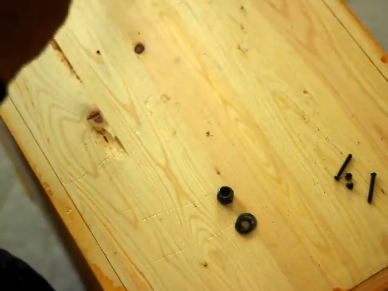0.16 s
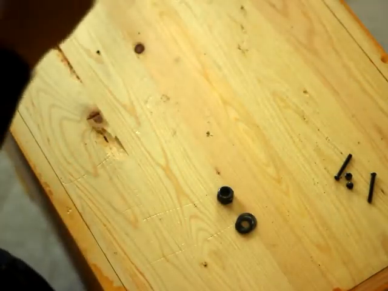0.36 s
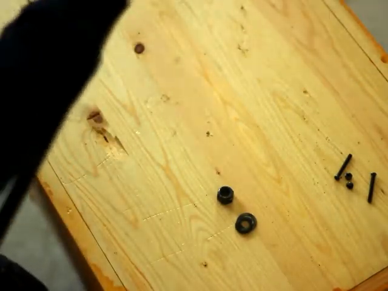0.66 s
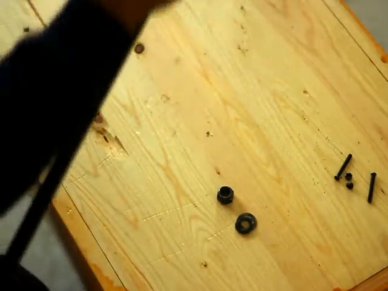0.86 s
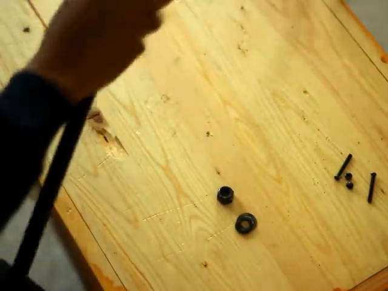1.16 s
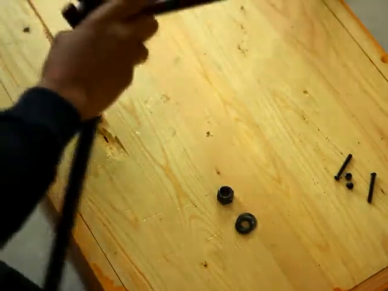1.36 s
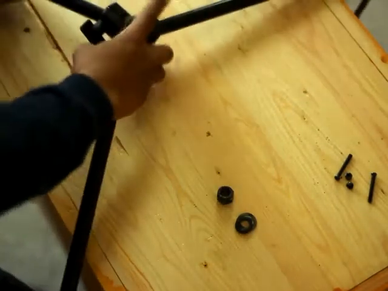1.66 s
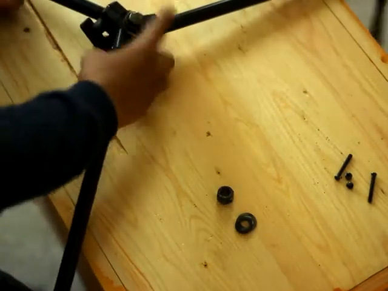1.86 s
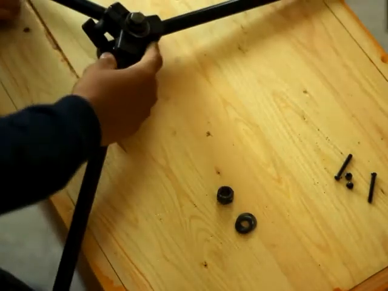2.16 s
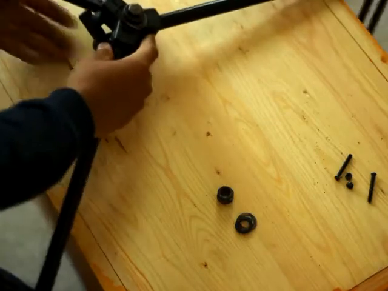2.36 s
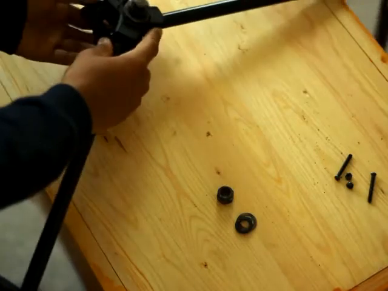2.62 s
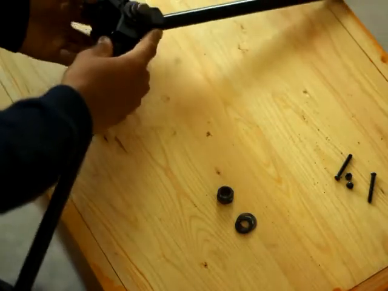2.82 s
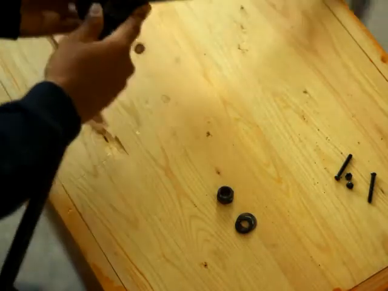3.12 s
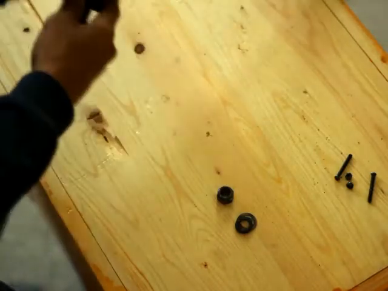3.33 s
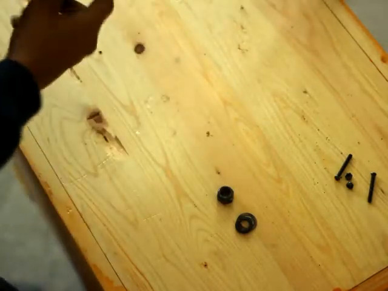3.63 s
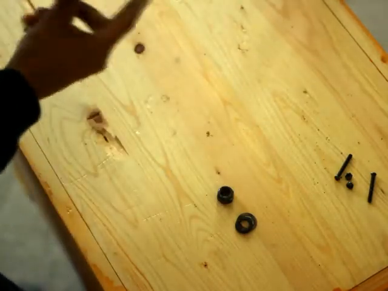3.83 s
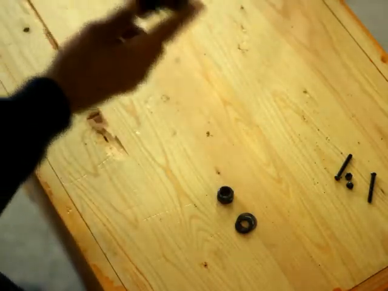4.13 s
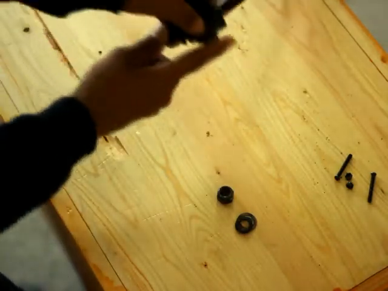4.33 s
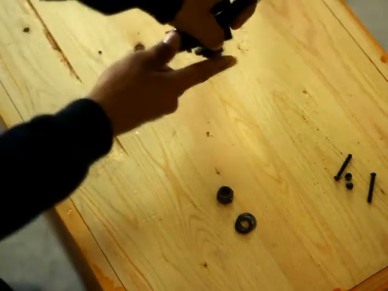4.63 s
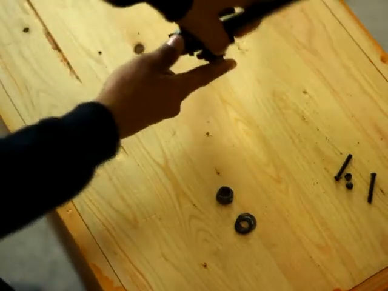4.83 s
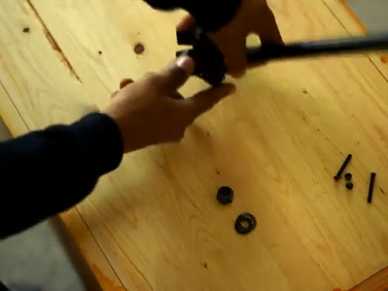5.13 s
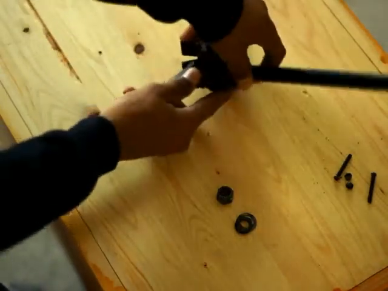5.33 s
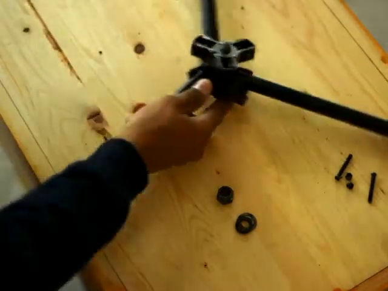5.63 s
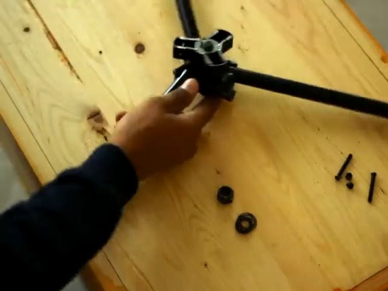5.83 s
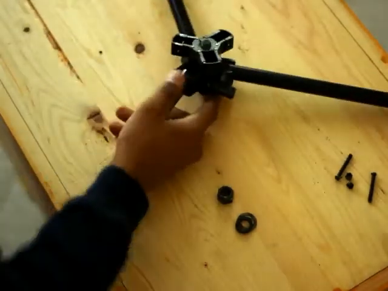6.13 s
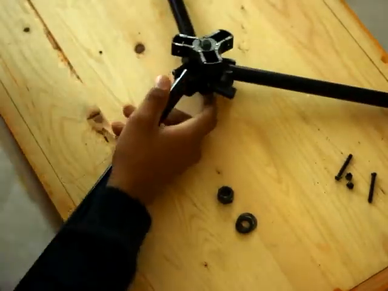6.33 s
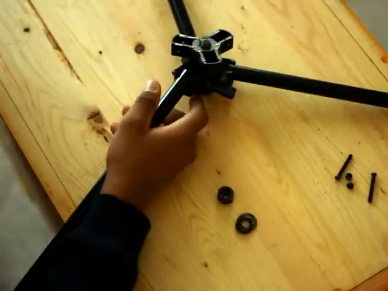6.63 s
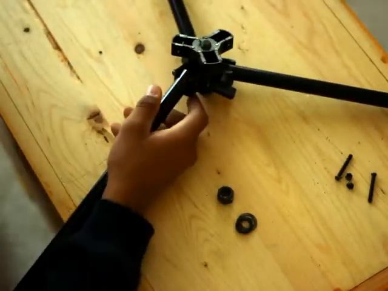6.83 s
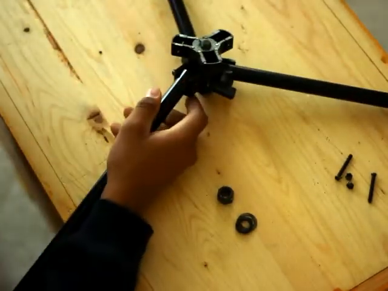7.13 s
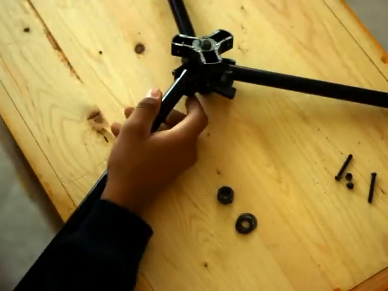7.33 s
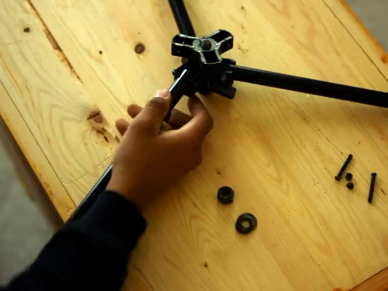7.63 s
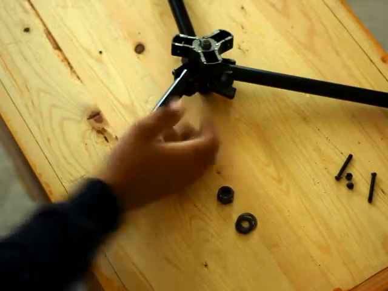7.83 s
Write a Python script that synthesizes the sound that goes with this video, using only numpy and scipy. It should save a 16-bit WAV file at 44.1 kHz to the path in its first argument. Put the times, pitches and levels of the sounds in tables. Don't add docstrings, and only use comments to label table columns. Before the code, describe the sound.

A three-legged metal stand is turned over by hand on a wooden table, legs clattering, slapping the boards, then settling with faint high rings.

```python
import sys
import numpy as np
from scipy import signal
from scipy.fft import rfft, irfft, next_fast_len
from scipy.io import wavfile
from scipy.ndimage import map_coordinates

SR = 44100
rng = np.random.default_rng(int(sys.argv[2]) if len(sys.argv) > 2 else 0)


def wav_record(signal):
    frames = np.transpose(np.atleast_2d(signal))
    bounded = np.clip(frames, -1, 1)
    quanta = np.round(bounded * 32767).astype(np.int16)
    wavfile.write(sys.argv[1], SR, quanta)


def natural_amplitude(level_db):
    exponent = np.asarray(level_db, float) / 20
    return 10 ** exponent


N = 351477

# pitch_hz, level_db (per Hz)
HISS = [(18, -26.5), (30, 3.5), (183, -3.5), (226, -1.5), (318, -6), (362, -7), (536, -3.5), (596, -7),
        (2210, -10.5), (12800, -12), (15800, -11.5)]
# pitch_hz, likeness (0 to 1)
HISS_ALIKE = [(60, 0.39), (240, 1), (950, 0.69), (3770, 0.41), (15000, 0.63)]
HISS_DB = -47.5
# pitch_hz, t60_s
ROOM = [(150, 0.29), (1000, 0.31), (5000, 0.24), (14000, 0.24)]

# start_s, rubbing_db, support_shake_db
HANDLING = [(0, -22.5, -48), (.15, -50, -42), (.5, -53, -62), (1.0, -90, -82), (1.1, -28, -39),
            (1.401, -24, -37.5), (1.9, -42, -79), (2.25, -36.5, -72), (2.7, -49, -57), (3.1, -30, -48),
            (3.4, -40, -66), (4.42, -62, -69), (4.5, -35, -48.5), (4.7, -19.5, -30), (4.949, -49, -64),
            (6.05, -11.5, -47), (6.3, -32.5, -54.5), (7.97, -68.5, -58.5)]
# pitch_hz, level_db (per Hz)
RUMBLE = [(11, -30.5), (18, -16.5), (75, -4), (113, -9.5), (130, -1.5), (170, -36.5), (290, -120)]
# pitch_hz, level_db (per Hz)
DRONE = [(53, -33.5), (90, -10.5), (195, 4), (300, -1.5), (397, -1.5), (578, -15), (900, -15),
         (1170, -48.5), (1980, -120)]
# pitch_hz, level_db (per Hz)
SLEEVE = [(290, -18.5), (500, -10.5), (572, -10.5), (1070, -11.5), (1980, -15.5), (5000, -24.5),
          (6500, -90), (11000, -120)]
DRONE_DB, DRONE_GROWS = -49, 0.4
AFTER_DB, AFTER_GROWS, AFTER_T60 = -27, 2.1, 0.58

# start_s, length_s, level_db
SLIDES = [
    (2.217, 0.076, -50.5),
    (2.345, 0.17, -55.5),
    (2.957, 0.24, -52.5),
    (4.059, 0.073, -53.5),
    (4.468, 0.27, -48.5),
    (5.415, .015, -35.5),
    (1.068, 0.083, -25.5),
    (5.784, 0.074, -36),
]
# pitch_hz, width_hz, level_db
SCRAPE = [(590, 73, 9.5), (824, 26, 9), (1090, 114, -4), (1500, 230, -6), (2050, 290, -6.5),
          (4180, 1100, -36)]
SLIDE_EDGE_S = 0.0082

# pitch_hz, width_hz, level_db
BOARDS = [(222.2, 12, 10.5), (413, 14.8, 7), (560, 93, 2.5), (786, 52, -1.5), (1080, 223, -7),
          (1420, 62, -31)]
# start_s, peak_db, upper_boards_db
KNOCKS = [(1.0602, -17, 11.5), (1.066, -20, 11), (1.083, -19, 7), (1.129, -20.5, 6.5), (1.167, -24.5, 8.5),
          (1.225, -21, 1), (1.282, -15, -10), (1.329, -12, -1.5), (1.384, -17.5, -3.5), (1.583, -16.5, -1),
          (1.659, -17.5, -2.5), (1.901, -27.5, -25), (1.968, -25, -10), (2.371, -46, 1), (2.646, -41, 2),
          (2.808, -27, -2), (2.826, -26, -1), (3.131, -29, -6), (3.158, -33, -12), (3.481, -39, -23),
          (3.642, -32, -3), (3.886, -35.5, -12), (4.585, -35.5, 3), (4.617, -30, 0), (4.656, -10.5, -11),
          (5.137, -22.5, -19), (5.449, -15.5, -3.5), (5.634, -12, -12)]
# start_s, peak_db, pitch_hz, upper_boards_db
SLAPS = [(1.6964, 1, 239, -25.5), (5.2806, 0.5, 248, -27.5), (5.4679, -4, 298, -9), (5.577, -3, 242, -16.5),
         (5.661, -2, 280, -8), (5.737, 0, 248, -10.5), (5.867, -5.5, 195, -7), (5.888, 4.5, 253, -16.5),
         (6.403, -17, 340, -5.5), (6.469, -14.5, 318, -35), (6.557, -22, 324, -20),
         (6.702, -21.5, 170, -10)]
# start_s, peak_db, pitch_hz, upper_boards_db
LOADED = [(1.098, -19.5, 437, 6.5), (4.684, -14.5, 231, -8), (4.738, -35, 230, -21), (1.721, -28, 289, -26),
          (5.294, -26.5, 273, -53), (5.427, -12, 410, -28), (5.499, -29, 268, -10.5),
          (5.553, -22.5, 288, -13.5), (5.626, -3.5, 342, 3), (5.682, -6.5, 268, -2), (5.749, -4, 382, -19),
          (5.972, -7.5, 398, -17), (6.018, -5.5, 386, -8), (6.43, -14, 400, -16), (6.904, -31, 391, -11)]
TABLE_HZ, SPREAD = 212.6, 0.057
KNOCK_T60, SLAP_T60, LOADED_T60 = 0.14, 0.036, 0.071
RISE_S = 0.00093

# start_s, peak_db, pitch_hz, t60_s
TAPS = [(0, -48, 1186, 0.51), (0.071, -20.5, 71.6, 0.19), (.886, -32, 91, 0.068), (1.062, -17, 105, 0.18),
        (1.33, -16.5, 115, 0.16), (1.58, -19, 80, 0.16), (1.96, -28.5, 139, 0.3), (1.966, -34, 560, 0.13),
        (1.975, -38, 1980, 0.042), (2.236, -37, 1110, 0.041), (4.698, -17, 234.3, 0.31),
        (2.25, -43, 648, 0.11), (2.38, -44, 471, 0.39), (2.856, -19, 227, 0.099), (3.125, -34, 640, 0.054),
        (3.147, -26, 98, 0.092), (5.135, -33, 70, 0.16), (5.396, -35, 1500, .02), (5.626, -7.5, 67.7, .12),
        (5.772, -8.5, 328, 0.11), (.14, -34.5, 1564, 0.19), (1.385, -17.5, 570, 0.22),
        (1.582, -20.5, 590, 0.13), (1.704, -32.5, 1422, 0.35), (3.53, -34.5, 1870, 0.025),
        (4.872, -35, 1080, 0.071), (5.131, -31, 1080, 0.069), (5.135, -27, 408, 0.13),
        (5.288, -8.5, 413, 0.037), (5.74, -5, 1242, 0.028), (6.9, -41.5, 1820, 0.12),
        (7.01, -42, 696, 0.11), (7.294, -44.5, 1762, 0.098), (7.465, -49, 1740, 0.18),
        (7.913, -21, 71.6, 0.091), (7.933, -14.5, 59.5, 0.079)]
# start_s, peak_db,
# pitch_hz, t60_s
PINGS = [(0.506, -35.5, 2700, 0.022), (1.063, -24, 4950, 0.054), (1.147, -10.5, 3447, 0.038),
         (1.151, -25.5, 2046, 0.35), (1.977, -30, 3205, 0.067), (3.32, -29, 3300, 0.01),
         (3.478, -30, 3410, .012), (5.156, -35.5, 3250, 0.25), (5.296, -33.5, 3240, 0.14),
         (5.459, -27.5, 9810, 0.022), (5.578, -20, 9800, 0.016), (5.638, -17.5, 7550, .13),
         (5.6398, -7, 11200, 0.09), (5.640, -2, 9360, 0.15), (5.638, -18, 5950, .25),
         (5.653, -10, 4490, 0.04), (5.664, -25, 3200, 0.1), (5.708, -23.5, 3330, 0.3),
         (5.772, -37, 3260, 0.28), (5.969, -2, 3254, 0.063), (6.432, -16, 2770, 0.026),
         (6.434, -28, 4300, 0.029), (6.406, -21, 4400, 0.032), (5.821, -36.5, 3240, 0.5),
         (5.895, -23, 3270, 0.19), (5.689, -24.5, 5920, 0.15), (5.749, -25, 4590, 0.16),
         (4.658, -41, 6100, 0.12), (4.74, -24, 7620, 0.083), (4.741, -40, 3250, 0.18),
         (4.884, -50, 3060, 0.18), (4.89, -46, 6430, 0.12), (4.9, -43, 590, 0.13), (5.14, -33, 581, 0.19),
         (5.16, -47, 5900, 0.22),
         (1.153, -16.5, 7900, 0.26), (1.155, -18, 15060, .3), (1.171, -15, 8700, 0.14),
          (1.19, -24, 10800, 0.16), (1.125, -26, 13000, 0.4), (1.344, -26, 5960, 0.1),
          (1.557, -12, 12770, 0.16), (1.551, -25, 10340, 0.25), (1.56, -34, 7960, 0.67),
          (1.592, -20.5, 3220, 0.04), (1.698, -15, 9520, 0.017), (1.705, -31, 4530, 0.026),
          (2.805, -33, 2050, 0.041), (2.825, -24, 5200, 0.02), (2.827, -25, 3220, .04),
          (2.84, -29, 2050, 0.044), (5.298, -36, 7700, .08), (5.301, -42.5, 4400, 0.1),
          (5.49, -35.5, 15200, 0.29), (5.5, -39.5, 12700, .2), (5.586, -31, 9970, 0.039),
          (5.639, -12.5, 4480, 0.024), (5.664, -13.5, 4270, 0.025), (5.686, -20, 9200, 0.11),
          (5.77, -23, 10660, 0.14), (5.745, -29, 8750, 0.74), (5.97, -25, 7600, .18),
          (5.971, -16.5, 10090, 0.23), (5.97, -14.5, 15000, 0.15), (5.97, -24, 6190, 0.14),
          (5.972, -20.5, 10660, .1), (6.011, -9.5, 8050, 0.079), (6.029, -13, 8800, 0.08),
          (6.03, -23, 12790, 0.12), (6.195, -36, 10900, 0.054), (6.45, -36, 12800, 0.17),
          (6.46, -37, 8750, 0.37), (6.705, -41.5, 3747, .6), (7.915, -29, 148, 0.053),
          (7.934, -22, 128, 0.051)]
# start_s, peak_db, pitch_hz, t60_s
GRAZES = [(1.29, -29, 3240, .15), (1.378, -27.5, 1810, 0.21), (1.385, -30, 2630, .12),
          (1.665, -32, 3250, 0.18), (1.71, -35.5, 1260, .3), (3.92, -48.5, 2100, 0.95),
          (4.48, -50.5, 1090, 1), (4.49, -45, 590, 0.97), (5.445, -26, 1405, 0.14),
          (5.455, -34, 3240, 0.26), (5.63, -9, 1114, 0.052), (5.665, -17, 3190, .15),
          (5.677, -16, 1740, 0.031), (5.70, -19, 1170, 0.12), (5.67, -26.5, 6080, 0.25),
          (5.70, -25.5, 4500, .2), (5.79, -30.5, 3210, 0.5), (5.80, -37, 4700, 0.17),
          (5.90, -32, 4620, 0.17), (5.91, -44, 2050, 0.12), (6.902, -41.5, 3330, 0.035),
          (6.903, -39, 1070, 0.043), (6.72, -41, 3375, .6), (7.005, -32, 5990, 0.2),
          (7.32, -46.5, 5926, .45), (6.79, -38, 5926, .4), (6.35, -37.5, 390, 0.45), (6.3, -39, 50, 0.56),
          (6.55, -36, 45.8, 0.34), (7.3, -41.5, 60, .3)]

ROD_HZ = [3375, 3747, 5911, 5938, 7100, 7634, 8969, 9005, 9098, 9254, 11170, 11960, 13170]
# level_db, t60_s
ROD = [(-5, 0.51), (-21.5, 0.55), (-9.5, 0.11), (13.5, 0.027), (-14.5, 0.14), (-18, 0.46), (1, 0.17),
       (3.5, 0.15), (-5, 0.15), (-5, 0.1), (-19, 0.28), (-12, 0.17), (-10, 0.26)]
# start_s, first_mode_db, second_pair_db, other_modes_db, free_s (until a finger stops it)
BLOWS = [
    (4.724, -43, -25, -35, 0.039),
    (4.744, -55, -22, -37, 0.019),
    (6.7038, -29, -1.5, -6, .185),
    (7.002, -31.5, -30, -58, 0.05),
    (7.097, -31, -60, -60.5, 0.021),
    (7.295, -21, -26, -30.5, 0.158),
    (7.464, -17, -24, -24.5, 0.017),
]

LEG_HZ = [2094, 3255, 5943, 7472, 7913, 8053, 8390, 8775, 10087, 10740, 11300, 12790, 13160, 14520, 14975,
          15060]
# level_db, t60_s
LEGS = [(4, 0.26), (-2.5, 0.4), (-7.5, 0.25), (-15.5, 0.24), (-14.5, 0.6), (-3.5, 0.48), (-20.5, 0.49),
        (-3.5, 0.3), (0, 0.11), (-1, 0.14), (-7, 0.18), (-2.5, 0.23), (-16, .15), (-2, 0.18), (-3.5, 0.16),
        (-18.5, 0.25)]
# pitch_hz, level_db (per Hz)
RATTLE = [(410, -13), (700, 2), (1160, -2), (2580, -2.5), (3300, -6), (3760, -7), (8120, -12.5),
          (13700, -15.5), (15000, -21), (15500, 5)]
# start_s, peak_db, rattle_t60_s, steel_ring_db
JOLTS = [(0.141, -42.5, 0.25, -2), (0.5038, -52.5, 0.066, -7), (0.9782, -42.5, 0.044, -19),
         (1.376, -22.5, 0.12, -24), (1.6613, -36.5, 0.21, -16), (1.7044, -21.5, 0.066, 2.5),
         (2.235, -50, 0.51, -31), (3.531, -46.5, 0.12, -13), (3.639, -41, 0.088, -13),
         (3.85, -51, 0.046, -30), (5.132, -30, 0.07, 0.5), (5.2953, -39, 0.066, -33),
         (5.43, -28.5, 0.11, -18.5), (5.459, -31.5, .138, -1), (5.6267, -16.5, 0.028, -3.5),
         (6.4044, -22.5, 0.1, -2.5), (6.903, -42, 0.079, -32.5)]
# start_s, peak_db, rattle_t60_s, steel_ring_db
CLACKS = [(0.8856, -46, 0.061, -19), (1.061, -19, 0.1, 3.5), (1.1, -33, 0.82, 10.5),
          (1.1469, -11.5, 0.13, 5.5), (1.2201, -24.5, 0.14, 7), (1.33, -21, 0.36, -1),
          (1.579, -28.5, 0.45, 5), (1.6987, -18, 0.092, -17), (1.917, -35.5, 0.1, 8),
          (1.9695, -36.5, 0.23, -18), (2.8231, -24.5, 0.16, -44), (3.4771, -39.5, 0.083, -25),
          (3.6588, -19, 0.084, -32), (3.882, -37, 0.17, -29), (4.6053, -32.5, 0.25, 7),
          (4.6551, -14.5, 0.16, -6), (4.8728, -37, 0.18, 11.5), (5.4483, -29.5, 0.079, -22),
          (5.642, -14, 0.21, -18), (5.735, -12, 0.25, -2), (6.0108, -1.5, 0.07, 0.5),
          (6.432, -21.5, 0.15, 0)]
# start_s, peak_db, rattle_t60_s, steel_ring_db
CLANKS = [(1.172, -13.5, 0.19, -1), (1.285, -20, 0.086, -4), (1.5482, -17, 0.22, 9),
          (3.9197, -29, 0.028, -10), (4.739, -20, 0.061, -27.5), (5.1537, -28.5, 0.24, -1),
          (5.485, -25.5, 0.19, -6), (5.586, -34, 0.077, -26), (5.6737, -22, 0.31, 10.5),
          (5.7077, -17.5, 0.19, -19), (5.9684, -3.5, 0.19, 3.5)]
# start_s, peak_db, rattle_t60_s, steel_ring_db
CHATTER = [(1.073, -18.5, 0.73, 4), (2.859, -31.5, 0.2, -22), (4.8896, -33.5, 0.12, 6),
           (5.577, -21, 0.034, -15), (5.653, -12.5, 0.31, 4), (5.7673, -11, 0.061, -18.5),
           (5.826, -20.5, 0.08, -13), (5.867, -33, .12, -13), (5.883, -9, 0.074, -9),
           (5.89, -17, 0.17, -26), (6.029, -8, 0.26, -12), (6.176, -26, 0.041, 9.5),
           (6.1944, -27, 0.046, -18), (6.333, -36, 0.022, -20)]
# dull_part_db, low_modes_db
CONTACT = [
    (11, -12.5),
    (3.5, -13),
    (-4.5, -14),
    (-21.5, -33.5),
]
HELD = 1.2


def unit(x):
    return x / np.sqrt(np.mean(x ** 2) + 1e-20)


def along(points, hz):
    f, v = np.transpose(points)
    return np.interp(np.log(hz + 1), np.log(f + 1), v)


def filtered(x, response):
    m = next_fast_len(x.shape[-1] + SR // 2)
    spectrum = rfft(x, m) * response(np.fft.rfftfreq(m, 1 / SR))
    return irfft(spectrum, m)[..., :x.shape[-1]]


def noise(spectrum, size=N):
    return unit(filtered(rng.standard_normal(size), lambda hz: natural_amplitude(along(spectrum, hz))))


def wobble(rate):
    knots = rng.standard_normal(int(N * rate / SR) + 4)
    return map_coordinates(knots, [np.arange(N) * rate / SR])


def add(track, s, sound):
    track[round(s * SR):][:len(sound)] += sound


def ringing(hz, db, t60, t, rough, rate=120):
    knots = rng.standard_normal((2, len(hz), int(t[-1] * rate) + 2))
    knots = knots[0] + 1j * knots[1]
    shake = np.array([np.interp(t * rate, np.arange(len(row)), row) for row in knots])
    decay = natural_amplitude(db[:, None] - 60 * t / t60[:, None])
    onset = 1 - np.exp(-2.5 * hz[:, None] * t)
    waves = decay * np.exp(2j * np.pi * hz[:, None] * t)
    return (waves * (1 + rough * shake) * onset).imag.sum(0)


def resonances(f, table):
    return sum((-1) ** k * natural_amplitude(db) * 1j * f * width / (centre * centre - f * f + 1j * f * width)
               for k, (centre, width, db) in enumerate(table))


def boards(f):
    return resonances(f, BOARDS)


def hiss():
    def turn(hz):
        return np.arccos(np.clip(along(HISS_ALIKE, hz), -1, 1)) / 2

    def share(hz):
        return np.array([np.cos(turn(hz)), np.sin(turn(hz))])

    mid, side = filtered(np.array([noise(HISS), noise(HISS)]), share)
    return natural_amplitude(HISS_DB - 2.0) * np.array([mid + side, mid - side])


def room(x, apart, piece_s=.25):
    size = int(piece_s * SR)
    out = np.zeros((2, N + size + SR))
    for start in range(0, N, size):
        hz, t, z = signal.stft(rng.standard_normal((3, SR * 2 // 5)), SR, nperseg=256)
        decay = natural_amplitude(-60 * t / along(ROOM, hz)[:, None])
        tail = signal.istft(z * decay, SR, nperseg=256)[1]
        tail = tail[0] + apart * tail[1:]
        tail = tail / np.linalg.norm(tail[0])
        echo = signal.fftconvolve(x[None, start:start + size], tail, axes=1)
        out[:, start + 150:][:, :echo.shape[1]] += echo
    return out[:, :N]


def handling():
    s, *rows = np.transpose(HANDLING)
    sleeve_db, rumble_db = [np.interp(np.arange(N) / SR, s, row) for row in rows]
    after, t = np.zeros(N + SR), np.arange(SR // 2) / SR
    for s, db, *_ in KNOCKS + SLAPS + LOADED:
        add(after, s, natural_amplitude(AFTER_DB + AFTER_GROWS * db - 60 * t / AFTER_T60))
    drone = natural_amplitude(DRONE_DB + DRONE_GROWS * (sleeve_db + 48.5)) + after[:N]
    sleeve = noise(SLEEVE)
    sleeve = unit(sleeve + 0.4 * unit(filtered(sleeve, boards)))
    lumps = .5 * wobble(45)
    drag = drone * natural_amplitude(2.8 * lumps - 9.0) * noise(DRONE)
    drag = drag + natural_amplitude(sleeve_db - 20.5 + 1.5 * lumps + 1.2 * wobble(200)) * sleeve
    shake = noise(RUMBLE) + 0.87 * np.array([noise(RUMBLE), noise(RUMBLE)])
    return drag, natural_amplitude(rumble_db - 4.5 + 5.2 * wobble(7.8)) * shake


def slides():
    t, stroke = np.arange(N) / SR, np.zeros(N)
    for s, length, db in SLIDES:
        inside = np.minimum(t - s, s + length - t)
        stroke += natural_amplitude(db) * np.clip(inside / SLIDE_EDGE_S + .5, 0, 1)
    grains = rng.standard_normal(N) * natural_amplitude(2.5 * wobble(300) + 1.0 * wobble(30))
    return stroke * unit(filtered(grains, lambda f: resonances(f, SCRAPE)))


def taps(rows):
    out, t = np.zeros(N + SR), np.arange(SR * 3 // 10) / SR
    for s, db, hz, t60 in rows:
        steel = np.abs(np.array(LEG_HZ + ROD_HZ) / hz - 1).min() < .025
        if steel:
            rough, rate = .3, 90
        else:
            rough, rate = min(hz / 500, 1.6), max(14 / t60, 110, min(hz / 7, 420))
        add(out, s, ringing(*np.array([[hz], [db - 3], [t60]]), t, rough, rate))
    return out[:N]


def table():
    thumps, pushes, t = np.zeros(N + SR), np.zeros(N + SR), np.arange(SR // 4) / SR
    blows = [(s, db - 2.0, TABLE_HZ * (1 + SPREAD * rng.normal()), upper_db, KNOCK_T60)
             for s, db, upper_db in KNOCKS]
    blows += [row + (SLAP_T60,) for row in SLAPS]
    blows += [row + (LOADED_T60,) for row in LOADED]
    rise = -1.35 * (1 - np.exp(-t / RISE_S)) ** 2
    for s, db, hz, upper_db, life in blows:
        add(thumps, s, natural_amplitude(db - 60 * t / life) * np.sin(2 * np.pi * hz * t) * rise)
        push = natural_amplitude(db + upper_db + 34.0 - 60 * t / 0.052)
        add(pushes, s, push * rng.standard_normal(len(t)) / 8)
    return (thumps + filtered(pushes, boards))[:N]


def rod():
    out, t = np.zeros(N + SR), np.arange(SR * 3 // 10) / SR
    hz, (mode_db, t60) = np.array(ROD_HZ), np.transpose(ROD)
    tick_colour = [(700, -22.5), (1800, -3.5), (9000, -7.5), (13000, -32.0)]  # (Hz, dB per Hz)
    for s, first_db, second_db, other_db, free in BLOWS:
        family_db = np.select([hz < 3500, abs(hz - 5900) < 200], [first_db, second_db], other_db)
        tick = 0.31 * natural_amplitude(-60 * t / 0.074) * noise(tick_colour, size=len(t))
        held = (1 - np.exp(-t / 0.0041)) * natural_amplitude(-60 * np.maximum(t - free, 0) / 0.012)
        ring = ringing(hz, mode_db + family_db, t60, t, rough=0.07, rate=110)
        add(out, s, natural_amplitude(-6.5) * held * ring)
        add(out, s, natural_amplitude(max(first_db, second_db, other_db) - 8.5) * tick)
    return out[:N]


def chattered(ring, life):
    t = np.arange(SR // 10) / SR
    strikes = rng.standard_normal(len(t)) ** 3 * natural_amplitude(-60 * t / life)
    return signal.fftconvolve(ring, strikes / np.linalg.norm(strikes))


def joint_rattle():
    rattle = noise(RATTLE) * natural_amplitude(3.2 * wobble(400))
    crowd = rng.standard_normal(SR // 200)
    rattle = filtered(rattle, lambda f: natural_amplitude(2.2 * np.interp(f / 100, np.arange(len(crowd)), crowd)))
    dull = filtered(rattle, lambda f: 1 / (1 + (f / 4500) ** 6))
    keen = filtered(rattle, lambda f: 1 - 1 / (1 + (f / 11500) ** 14))
    return unit(dull), unit(rattle - dull - keen), unit(keen)


def legs():
    out, t = np.zeros(N + SR), np.arange(SR * 3 // 10) / SR
    hz, (mode_db, t60) = np.array(LEG_HZ), np.transpose(LEGS)
    dull, bright, keen = joint_rattle()
    kinds = zip([JOLTS, CLACKS, CLANKS, CHATTER], CONTACT)
    hits = [row + tone for rows, tone in kinds for row in rows]
    for s, db, life, high_db, dull_db, low_db in hits:
        start = int(rng.random() * (N - len(t)))
        cut = slice(start, start + len(t))
        mix = bright[cut] + natural_amplitude(dull_db) * dull[cut] + natural_amplitude(high_db + 6.5) * keen[cut]
        shape = .5 * natural_amplitude(-60 * t / 0.0082) + 0.25 * natural_amplitude(-60 * t / life)
        strength_db = mode_db + np.where(hz < 6500, low_db + 2.0, high_db - 6)
        strength_db = strength_db + 3 * rng.standard_normal(len(hz))
        ring_t60 = np.minimum(1.32 * t60, HELD * life + 0.053)
        ring = ringing(hz, strength_db, ring_t60, t, rough=2.36, rate=300)
        add(out, s, natural_amplitude(db) * shape * mix)
        add(out, s, natural_amplitude(db - 18.5) * chattered(ring, life=.02))
    return out[:N]


def scene():
    steel, small, wood = legs() + rod(), taps(TAPS + PINGS), table()
    drag, rumble = handling()
    echo = natural_amplitude(-6.5) * room(steel + 0.72 * small, apart=0.65) + natural_amplitude(-6.0) * room(wood, apart=0.3)
    return steel + small + wood + echo + drag + rumble + hiss() + slides() + taps(GRAZES)


def top_cut(x):
    return signal.sosfilt(signal.butter(12, 15800, fs=SR, output="sos"), x)


def record(dry):
    def microphones(hz):
        tilt = natural_amplitude(np.outer([-.6, .6], (hz / 13000) ** 4))
        return tilt / (1 + (hz / 15500) ** 60) / (1 + (32 / (hz + 1)) ** 4.5)

    x = filtered(dry, microphones) * natural_amplitude([[-4.4], [2.7]])
    x = x / (1 + np.abs(x / 1.01) ** 30) ** (1 / 30)
    return top_cut(x)


dry = scene()
out = record(dry)
wav_record(out)
```